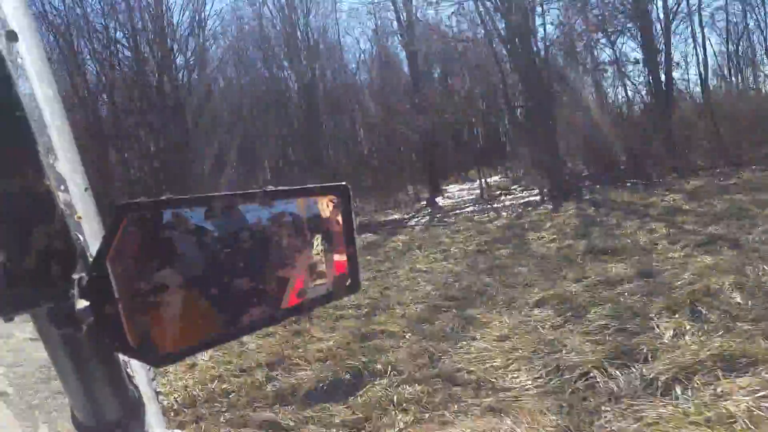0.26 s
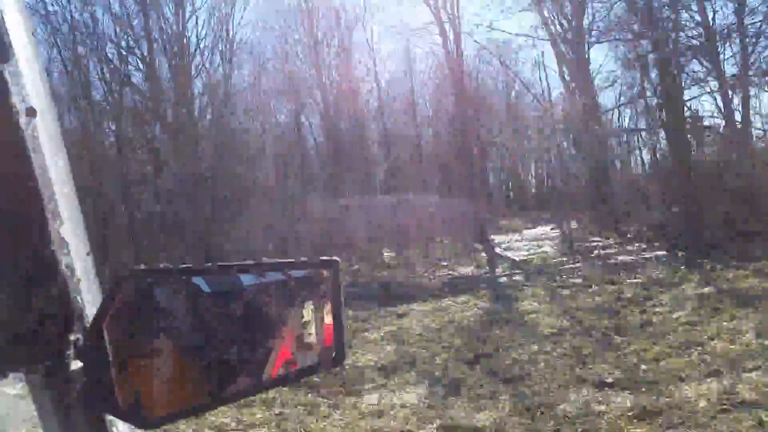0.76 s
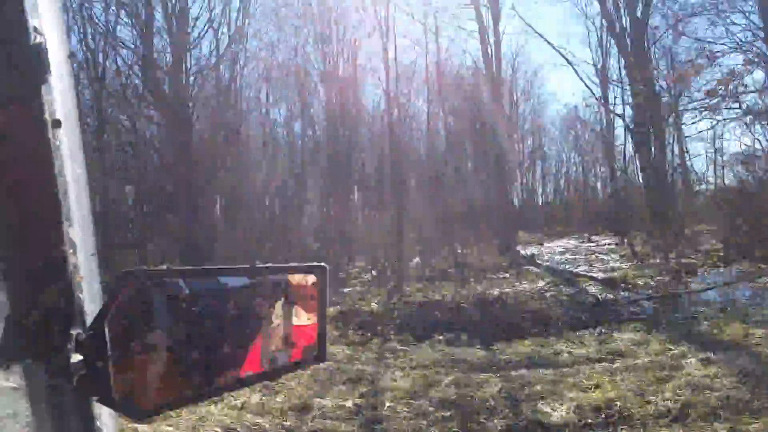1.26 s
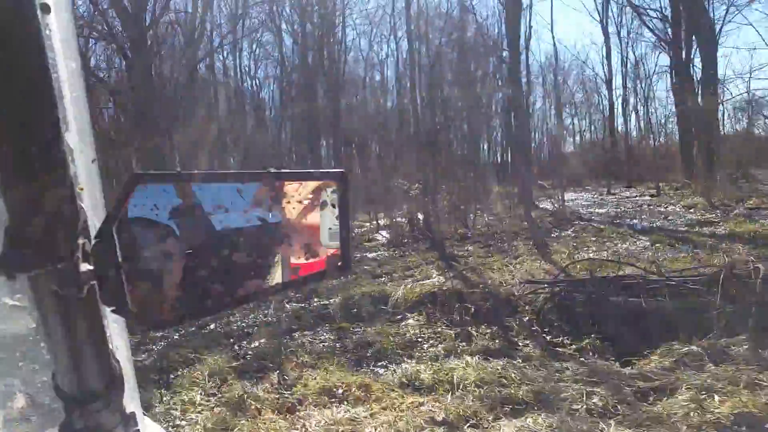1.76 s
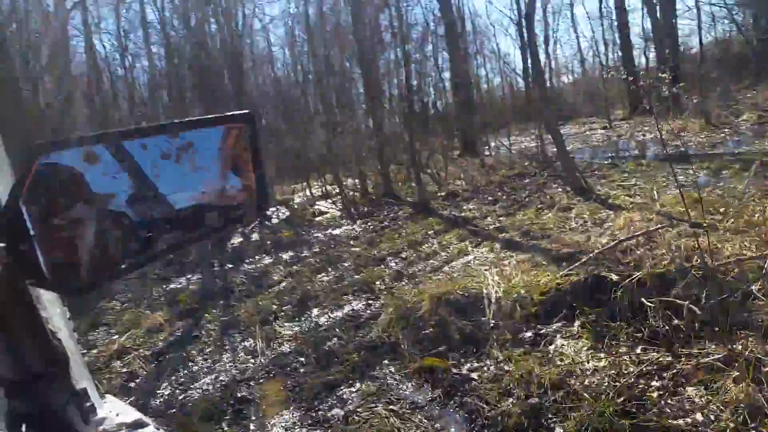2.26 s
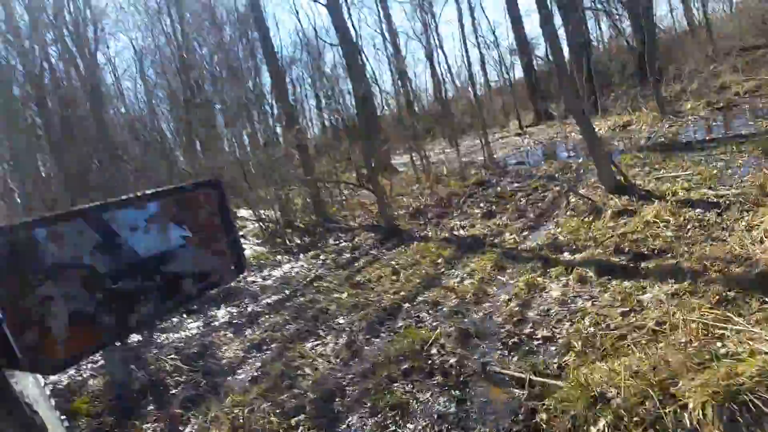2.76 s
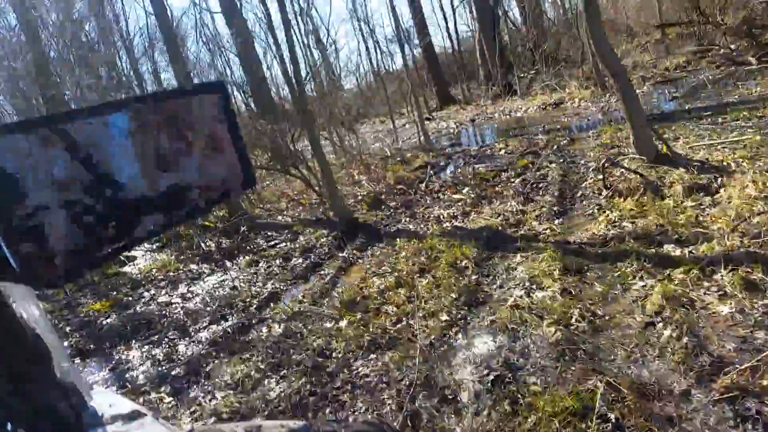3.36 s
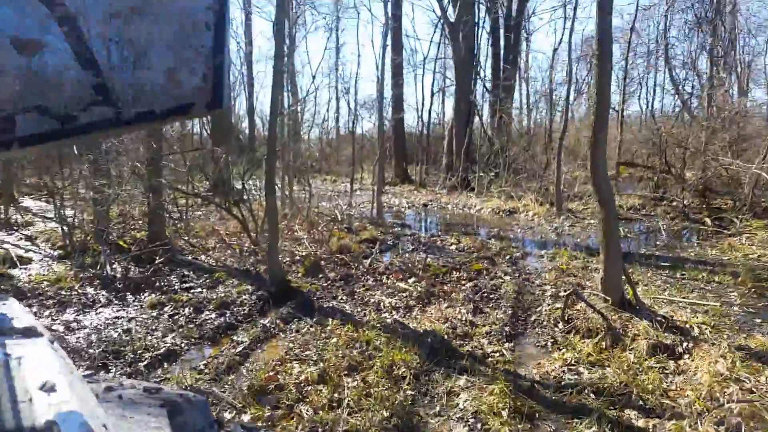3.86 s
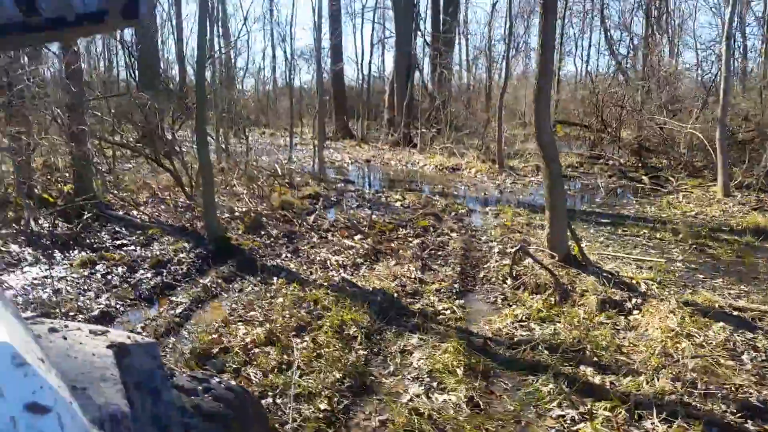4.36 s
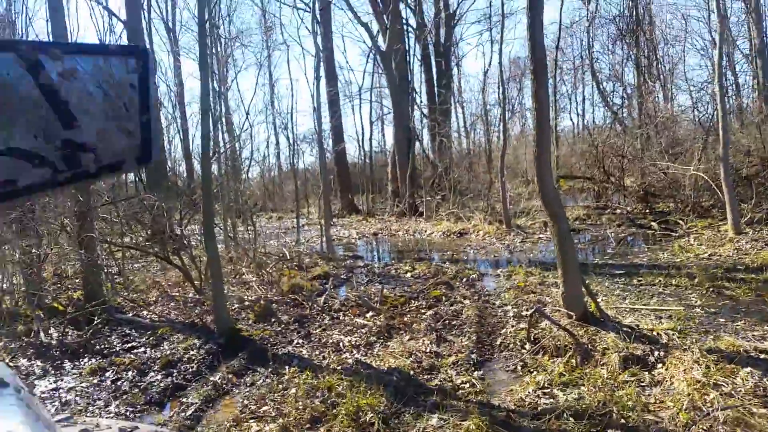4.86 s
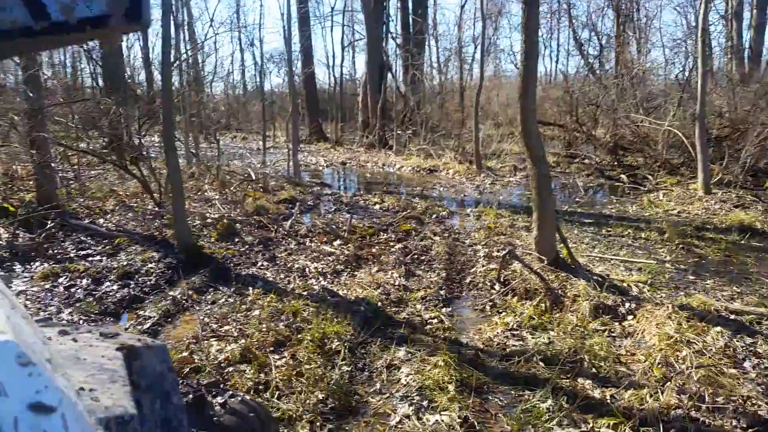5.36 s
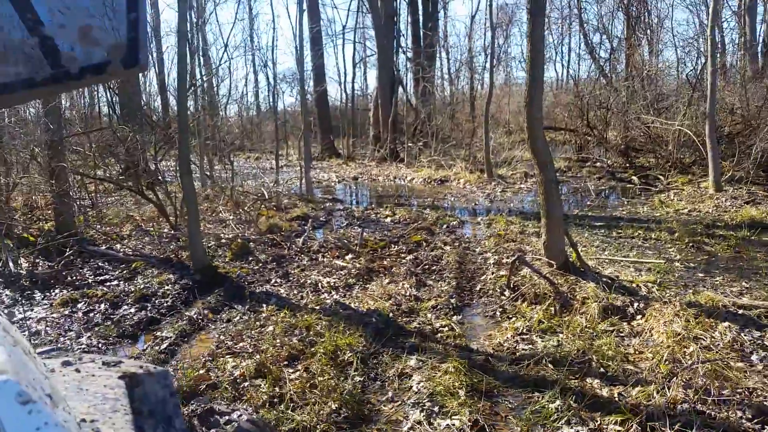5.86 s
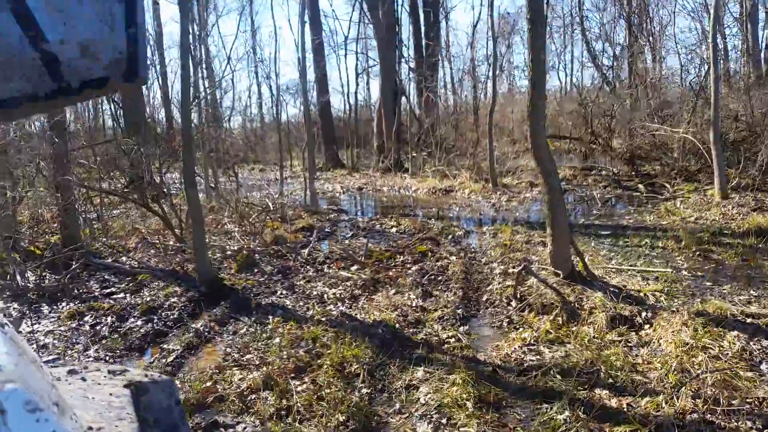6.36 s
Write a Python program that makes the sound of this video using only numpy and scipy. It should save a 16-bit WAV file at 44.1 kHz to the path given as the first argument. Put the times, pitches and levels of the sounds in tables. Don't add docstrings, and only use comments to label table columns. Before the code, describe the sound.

A thumping twin-cylinder off-road buggy crosses swishing grass, slows into spattering mud, blips, sinks to a rough idle, then revs up again.

```python
import sys
import numpy as np
from scipy import signal
from scipy.io import wavfile
from scipy.ndimage import uniform_filter1d

SR = 44100
rng = np.random.default_rng(int(sys.argv[2]) if len(sys.argv) > 2 else 0)


def output_pcm(signal):
    pcm = np.clip(np.atleast_2d(signal).T, -1, 1) * 32767
    wavfile.write(sys.argv[1], SR, np.round(pcm).astype(np.int16))


def invert_db(level):
    return 10 ** (np.asarray(level, dtype=float) / 20)


N = 292383


def rms_one(x):
    return x / np.sqrt(np.mean(x ** 2) + 1e-20)


def in_time(rows):
    s, *columns = np.transpose(rows)
    return [np.interp(np.arange(N) / SR, s, c) for c in columns]


def at_hz(points, hz):
    table_hz, table_db = np.transpose(points)
    return np.interp(np.log(hz), np.log(table_hz), table_db)


def drift(rate_hz):
    r = np.exp(-80 * np.pi * rate_hz / SR)
    slow = signal.lfilter([1], [1, -2 * r, r * r], rng.standard_normal(N // 40 + 2002))[2000:]
    return np.interp(np.arange(N) / 40, np.arange(len(slow)), rms_one(slow))


def resonate(x, hz, width_hz):
    r = np.exp(-np.pi * width_hz / SR)
    top, poles = (1 - r * r) / 2, [1, -2 * r * np.cos(2 * np.pi * hz / SR), r * r]
    return signal.lfilter([top, 0, -top], poles, x + 1e-18)


def add_at(out, start_s, burst):
    start = round(start_s * SR)
    out[start:start + len(burst)] += burst[:N - start]


def placed(x, left_db, lag):
    late = np.interp(np.arange(N) - lag, np.arange(N), x)
    dull = np.exp(-2 * np.pi * 600 / SR)
    right = signal.lfilter([1 - dull], [1, -dull], late)
    return np.array([invert_db(left_db) * x, invert_db(-left_db) * right])


def banded_noise(spectrum, patchy_db, grain_db):
    # hz, left_minus_right_db
    port_shade = [(60, 4.0), (110, 5.0), (200, 6.0), (370, 9.0), (680, 9.5), (1240, 9.0), (2280, 10.5),
                  (4170, 10.5), (7650, 13.0), (14000, 6.0)]
    low_hz, high_hz = spectrum[0][0], spectrum[-1][0]
    edges = low_hz * 2 ** np.arange(0, np.log2(high_hz / low_hz) + .2, 1 / 4)
    white = rng.standard_normal((2, 2, N)) * invert_db(grain_db * rng.standard_normal((2, 2, N)))
    out, together = 0, drift(34)
    for k, (low, high) in enumerate(zip(edges, edges[1:])):
        band_pass = signal.butter(2, [low, high], "band", fs=SR, output="sos")
        band = signal.sosfilt(band_pass, white[k % 2])
        hz = np.sqrt(low * high)
        alike = np.clip((330 / hz) ** 1.5, 0, .9)
        band[1] = alike * np.roll(band[0], shift=18) + np.sqrt(1 - alike ** 2) * band[1]
        shade = invert_db(at_hz(port_shade, hz) * np.array([[.5], [-.5]]))
        level = invert_db(at_hz(spectrum, hz) + patchy_db * (0.83 * together + drift(19)))
        out = out + level * band * shade / np.hypot(*shade)
    return out / np.std(out.mean(axis=0))


def frame_rumble(cycle, slow, flare):
    shake = np.clip(flare * (1 - slow) + .85 * slow, 0, 1)
    level_db = -41 + 22 * shake + 2.5 * drift(2.8)
    deep = signal.butter(2, [28, 50], "band", fs=SR, output="sos")
    low = rms_one(signal.sosfilt(deep, rng.standard_normal(N)))
    low = low * (1 + .9 * slow * np.cos(2 * np.pi * (cycle - .25)))
    return placed(invert_db(level_db - 7) * low, .7, 12.0)


def drive_line(gas_db, swish_db):
    # hz, level_db (per Hz)
    rush = [(200, -4), (300, -8.5), (450, -6.5), (700, -13), (850, -8.5), (1250, -15.5), (2550, -20),
            (3200, -38), (4500, -33.5)]
    level_db = -41.5 + 0.81 * (gas_db + 33) + 0.28 * np.maximum(swish_db + 49, 0)
    return invert_db(level_db + 1.5) * banded_noise(rush, patchy_db=-1.93, grain_db=2.0)


def valve_ticks(cycle, slow, hush):
    seatings = 3 * cycle + .27
    sizes = invert_db(1.5 * rng.standard_normal(int(3 * cycle[-1]) + 2))[seatings.astype(int)]
    rattle = rng.standard_normal((2, N)) * sizes * (0.28 + np.exp(-(seatings % 1) / 0.087))
    rattle = resonate(rattle, 3600, 1300) + .5 * resonate(rattle, 6000, 800)
    return invert_db(-56.5 + 0.5 * slow - 55 * hush) * rms_one(rattle) * invert_db([[3], [-6]])


def belt_whines():
    # start_s, length_s, pitch_hz
    squeaks = [
        (4.775, .02, 1520),
        (4.795, .1, 1520),
        (4.9, .095, 1520),
        (5.12, .22, 2480),
        (3.79, .04, 2500),
        (1.74, .03, 6000),
        (2.18, .03, 6600),
        (2.34, .03, 6100),
        (2.75, .03, 10000),
    ]
    squeak_db = [-44, -42, -43, -61, -48, -46, -47, -46, -47]
    out = np.zeros(N)
    for (start_s, length_s, hz), db in zip(squeaks, squeak_db):
        t = np.arange(round(length_s * SR)) / SR
        waver = rms_one(resonate(rng.standard_normal(len(t) + 2000), hz, 80)[2000:])
        tone = np.sin(2 * np.pi * hz * t) + .4 * waver
        add_at(out, start_s, invert_db(db + 2) * np.sin(np.pi * t / length_s) ** .5 * tone)
    return placed(out, 4.2, 40.0)


def brushes():
    # start_s, peak_db
    stalks = [(0.0772, -24), (0.1244, -25), (0.3344, -24.5), (0.4654, -29), (0.5374, -40), (0.6459, -29),
              (0.8424, -28), (0.8939, -23.5), (1.1344, -30), (1.2375, -23.5), (1.297, -23.5), (1.3734, -24),
              (1.4894, -27.5), (1.5414, -23.5), (1.5814, -23.5), (1.6174, -23.5), (1.7404, -27),
              (1.7854, -34), (1.8824, -26.5), (2.0033, -26.5), (2.0564, -24), (2.1051, -22),
              (2.2992, -24.5), (2.351, -25), (2.4354, -34), (2.5144, -29), (2.5496, -23.5), (2.5985, -24),
              (2.7054, -22), (2.9168, -33)]
    # start_s, peak_db
    clods = [(2.8094, -31), (3.2605, -31), (3.6564, -17.5), (3.7074, -23.5), (3.7964, -25), (3.8691, -27),
             (3.939, -21.5), (4.0582, -25.5), (4.0826, -27), (4.1091, -26), (4.1917, -21), (4.4358, -31.5),
             (4.4774, -34), (4.7581, -26.5), (4.9705, -33), (5.0335, -42), (5.0993, -39), (5.224, -40),
             (5.2594, -42), (5.6304, -41), (6.1424, -41), (6.1754, -40), (6.2148, -35.5), (6.2674, -35),
             (6.5715, -40)]
    out, t = np.zeros(N), np.arange(SR // 8) / SR
    for rows, length_s in ((stalks, 0.027), (clods, 0.031)):
        for start_s, peak_db in rows:
            rub = (1 - np.exp(-t / 0.001)) * np.exp(-(t / length_s) ** 2.1)
            add_at(out, start_s, invert_db(peak_db - 13.5) * rub)
    return out


def ground_swish(swish_db, hush):
    # hz, level_db (per Hz)
    sliding = [(1500, -3), (2400, -7.5), (3100, -8), (4500, -8.5), (6700, -3.5), (8200, -8.5), (10000, -6),
               (11700, -2.5), (13000, -7.5), (15000, 1)]
    # hz, level_db (per Hz)
    rubbing = [(2000, -3), (4500, -8.5), (6500, -3.5), (8200, -11.5), (10000, -3.5), (11600, -0.5),
               (13000, -5.5), (15000, 0.5)]
    swish = invert_db(swish_db - 7.5 * hush) * banded_noise(sliding, patchy_db=1.5, grain_db=5.0)
    swish += brushes() * banded_noise(rubbing, patchy_db=1.0, grain_db=2.0)
    return swish + 1.08 * resonate(swish, 11700, 890)


def suspension_knocks():
    # start_s, peak_db, pitch_hz
    blows = [
        (3.24, -30, 516),
        (3.334, -19, 501),
        (4.328, -23, 420),
        (4.748, -31, 410),
    ]
    out, t = np.zeros(N), np.arange(SR // 5) / SR
    for start_s, peak_db, hz in blows:
        puff = resonate(rng.standard_normal(len(t)), 0.59 * hz, 600) * 2.0
        add_at(out, start_s, invert_db(peak_db) * np.exp(-t / 0.019) * (np.sin(2 * np.pi * hz * t) + puff))
    return out


def exhaust_bark(cycle):
    # pitch_hz, width_hz, level_db
    pipe = [(219.4, 72, -2.5), (304, 5.5, -0.5), (371.5, 35, -7), (450.4, 9.9, 4), (492, 51, -6.5),
            (631, 82, -8.5), (833, 36, -11.5)]
    gas = rng.standard_normal(N) * (1 + 0.17 * np.cos(2 * np.pi * (cycle - .2)))
    rings = 0
    for k, (hz, width_hz, db) in enumerate(pipe):
        rings = rings + (-1) ** k * invert_db(db) * resonate(gas, hz, width_hz)
    return rms_one(rings)


def engine_hum(cycle, level_db, lift):
    # order (per cycle), pulling_db, lifted_db
    upper_orders = [(6, -26, -30), (7, -24, -19), (8, -22, -24), (9, -32, -15), (10, -24, -22),
                    (11, -38, -24), (12, -30, -14), (13, -38, -29), (14, -32, -19), (15, -35, -28),
                    (18, -35, -32)]
    lift, hum = np.clip(lift, 0, 1), 0
    for order, pull_db, lift_db in upper_orders:
        order_db = pull_db + lift * (lift_db - pull_db) + 2.0 * drift(2.2)
        hum = hum + invert_db(order_db) * np.cos(2 * np.pi * (order * cycle + rng.random()))
    hum = invert_db(level_db + 5.0) * hum
    return hum + 0.71 * resonate(hum, 304, 17)


def stumbles():
    # time_s, change_db
    uneven = [(1.31, -5), (3.335, 0.5), (3.4, -1.5), (4.22, -1.5), (4.305, 5), (4.36, 0.5), (4.41, 5),
              (4.56, -7), (4.655, -0.5), (4.85, -2.5), (5.04, 2), (5.25, 2), (5.32, -3), (5.56, -0.5),
              (6.21, -2.5), (6.35, 0.5)]
    t = np.arange(0, N / SR + .01, .002)
    change_db = sum(db * np.exp(-((t - s) / .022) ** 4) for s, db in uneven)
    return np.interp(np.arange(N) / SR, t, change_db)


def air_box_thumps(cycle, per_s, hz, first, after, level_db):
    beats = [
        (0, .22, 1.26),
        (.235, 0, .84),
        (.476, .38, .4),
    ]
    scatter, out = rng.standard_normal((int(cycle[-1]) + 2, 3)), 0
    idle = np.clip((17 - per_s) / 4, 0, 1)
    after = after + 0.05 * idle
    for k, (strength, (angle, phase, fall)) in enumerate(zip((first, 1, after), beats)):
        number = np.round(cycle - angle)
        swings = (cycle - angle - number) / per_s * hz
        fall_swings = fall * (1 - 0.27 * idle * (k < 2))
        envelope = np.exp(-(swings / np.where(swings < 0, .58, fall_swings)) ** 2)
        size = strength * invert_db(.6 * scatter[number.astype(int), k])
        out = out + size * envelope * np.cos(2 * np.pi * swings + phase)
    out = out + 0.41 * resonate(out, 164, 54) + .5 * resonate(out, 63.0, 23.0)
    return invert_db(level_db) * out


def scene():
    # time_s, speed (four-stroke cycles per s)
    speed = [(0.0, 31.89), (0.72, 30.94), (0.83, 32.87), (1.62, 29.19), (1.81, 29.53), (2.85, 25.11),
             (3.62, 12.28), (4.14, 9.92), (4.31, 14.78), (4.4, 21.88), (4.58, 17.02), (4.67, 31.06),
             (4.87, 32.29), (5.03, 21.15), (5.39, 11.45), (6.24, 10.62), (6.44, 27.51), (6.63, 36.08)]
    # time_s, swish_db
    ground = [(0, -42), (.55, -42), (.85, -39.5), (1.25, -41.5), (2.45, -41), (2.8, -36), (2.93, -38),
              (3.05, -35), (3.38, -30), (3.64, -31.5), (3.75, -38.5), (4.1, -43.5), (4.55, -52.5),
              (4.75, -47), (5.25, -58.5), (5.7, -64.5), (6.26, -59), (6.63, -47)]
    # time_s, main_firing_peak_db, air_box_ring_hz, after_beat (share 0-1), gas_noise_db
    effort = [(0, -5, 107.2, 0.68, -32.5), (1.4, -6.5, 102.2, .45, -34), (2.2, -6.5, 105.6, 0.44, -35.5),
              (2.6, -7, 99.7, 0.03, -33), (3.1, -8.5, 100.4, 0.14, -34), (3.28, -6, 111, 0.47, -33.5),
              (3.45, -8, 97, .95, -34.5), (3.72, -9, 107.6, 0.6, -35.5), (4.1, -4, 108.6, 0.46, -30),
              (4.35, -9.5, 110, 0.13, -30), (4.62, -2.5, 115, 0.23, -36.5), (4.745, -8, 135, 0, -30),
              (4.84, -11, 120, 0.9, -30), (5.06, -10.5, 114, 0.54, -39.5), (5.58, -14.5, 110.6, .36, -45.5),
              (5.9, -7.5, 113.3, 0.46, -37.5), (6.3, -4, 107.8, 0.33, -34.5), (6.63, -6, 142, 0.03, -31)]
    # time_s, lift (0-1)
    throttle_lift = [
        (.668, 0),
        (.705, .8),
        (.8, 1),
        (1.27, 1),
        (1.34, .6),
        (1.42, 0),
    ]
    # time_s, hush (0-1)
    clutch_hush = [
        (5.0, 0),
        (5.26, .15),
        (5.34, 1),
        (5.628, 1),
        (5.634, .2),
        (6.2, 0),
    ]
    (per_s,), (swish_db,) = in_time(speed), in_time(ground)
    (lift,), (hush,) = in_time(throttle_lift), in_time(clutch_hush)
    thump_db, ring_hz, after, gas_db = in_time(effort)
    cycle = .357 + np.cumsum(per_s) / SR

    lift_ring_hz = 39
    thump_db = thump_db - 5.5 * lift + stumbles()
    ring_hz = ring_hz + lift_ring_hz * lift
    after = np.clip(after - 0.15 * lift, 0, 1)
    gas_db = gas_db + lift
    flare = (ring_hz - 105) / lift_ring_hz

    slow = np.clip((27 - per_s) / 8, 0, 1)
    overrun = np.maximum(after - 0.36, 0)
    pull = np.tanh(uniform_filter1d(np.gradient(per_s) * SR, size=SR // 8) / 30)
    first = (0.4 + slow * (0.58 + 0.13 * pull)) * np.clip(1 - 0.63 * overrun, 0, 1)
    hum_db = thump_db - 10 + 5 * slow - 2.5 * overrun * (1 - slow) - 14 * pull ** 2
    bark_db = gas_db - 3.5 + 3.5 * np.maximum(pull, 0) * (1 - slow)

    around = frame_rumble(cycle, slow, flare) + drive_line(gas_db, swish_db)
    around = around + valve_ticks(cycle, slow, hush) + belt_whines() + ground_swish(swish_db, hush)
    hum = engine_hum(cycle, hum_db, flare + 0.062 * slow)
    body = placed(hum + invert_db(bark_db) * exhaust_bark(cycle) + suspension_knocks(), 3.96, 4.9)
    air_box = placed(air_box_thumps(cycle, per_s, ring_hz, first, after, thump_db), 2.8, 12.0)
    return around + body + air_box


def roll_off(x):
    return signal.sosfilt(signal.butter(12, 14620, fs=SR, output="sos"), x)


def record(dry):
    thin = signal.sosfilt(signal.butter(2, 38, "high", fs=SR, output="sos"), dry)
    soft = 1.15 * np.tanh(thin / 1.15)
    mix = signal.sosfilt(signal.cheby2(12, 60, 14900, fs=SR, output="sos"), soft)
    return roll_off(mix)


dry = scene()
out = record(dry)
output_pcm(out)
```